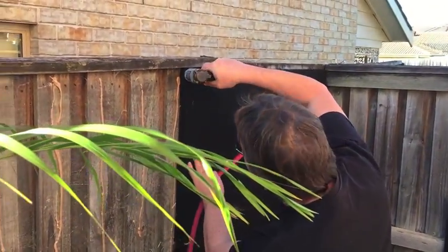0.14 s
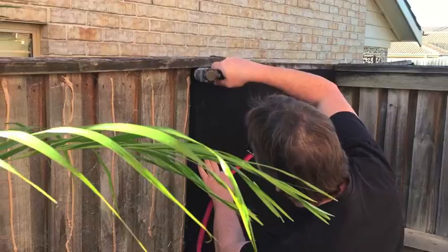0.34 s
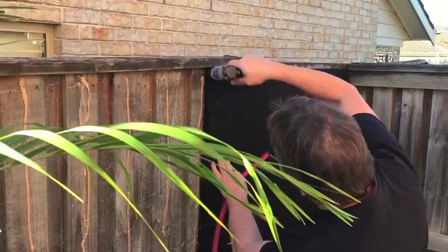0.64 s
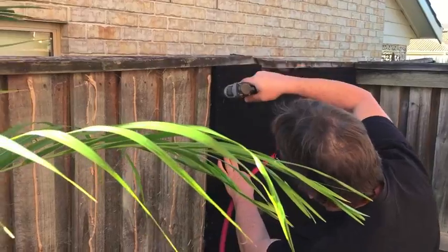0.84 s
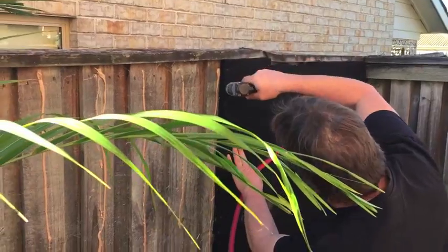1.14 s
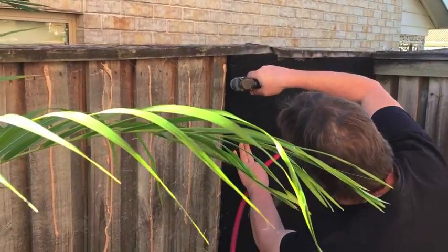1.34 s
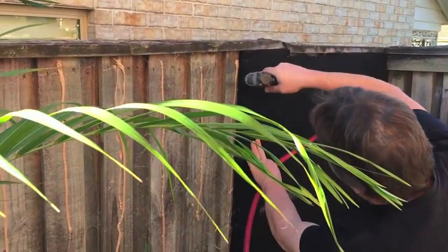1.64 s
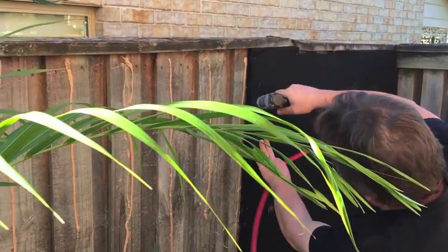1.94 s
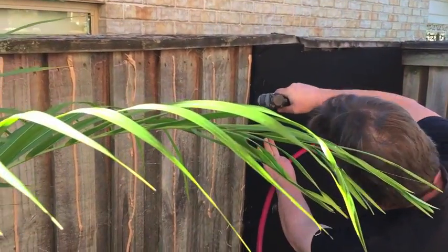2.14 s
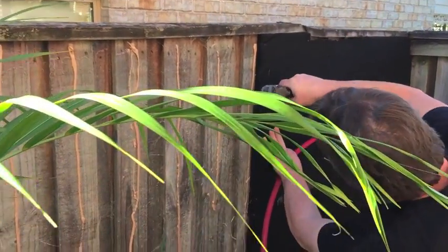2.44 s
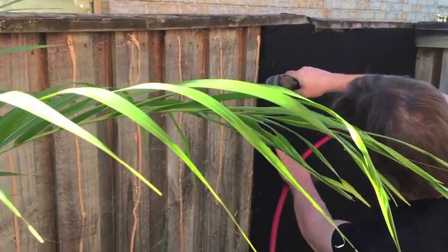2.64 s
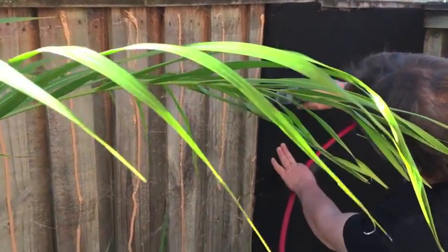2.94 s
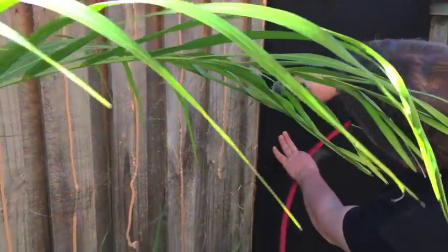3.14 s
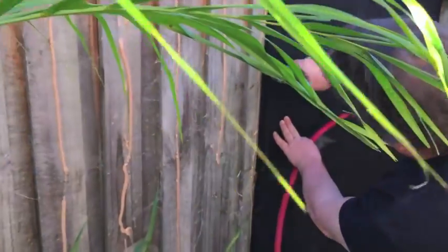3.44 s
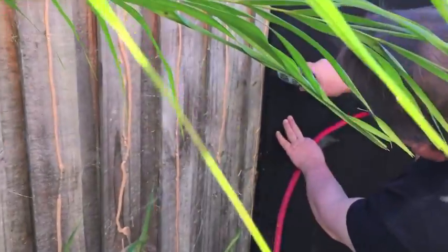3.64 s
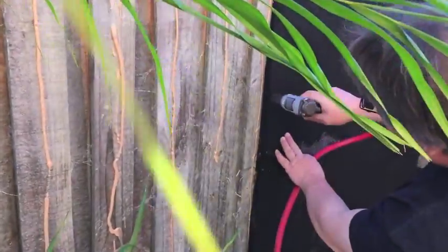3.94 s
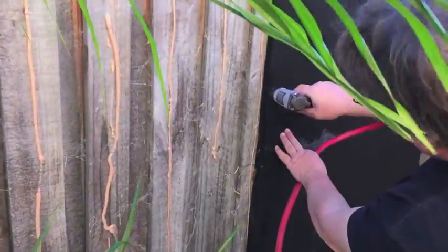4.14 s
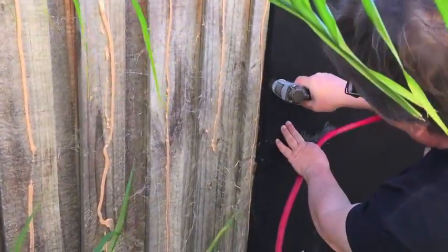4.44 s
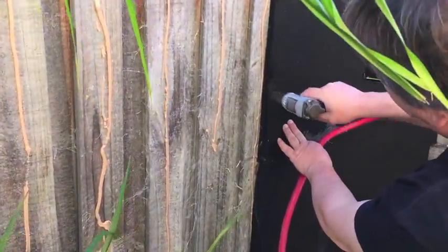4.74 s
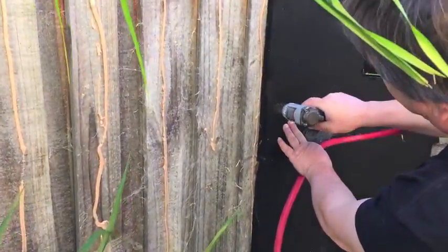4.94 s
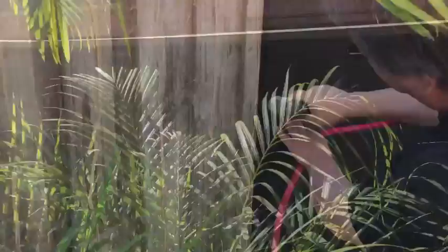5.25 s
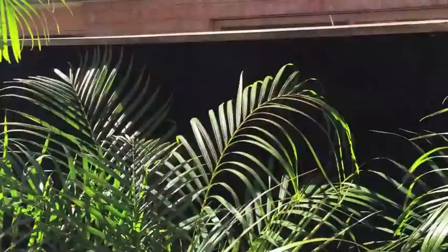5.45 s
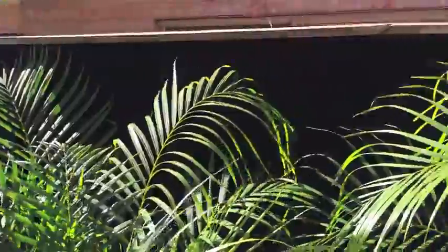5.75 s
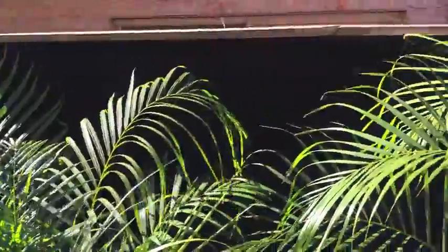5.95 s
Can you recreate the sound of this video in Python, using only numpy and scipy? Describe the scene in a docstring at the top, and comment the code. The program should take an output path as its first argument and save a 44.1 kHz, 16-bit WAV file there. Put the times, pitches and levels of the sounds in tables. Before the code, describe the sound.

Five evenly spaced pneumatic staple shots crack into fence boards, each with an exhaust puff, before an air compressor briefly chugs.

```python
"""A low outdoor rumble and faint scuffs, then an air-powered staple gun fires five staples through
lining into a wooden fence in a narrow yard. Each shot is a trigger tick, a spit of air and a blow
that rings the boards; on release the gun lets out its air and its piston knocks home. Wall and yard
echo the work, and leaves and lining rustle between shots. Near the end an air compressor chugs
briefly and fades, followed by three faint, far whistles."""
import sys
import numpy as np
from scipy import signal
from scipy.fft import rfft, irfft
from scipy.io import wavfile

SR = 44100
rng = np.random.default_rng(int(sys.argv[2]) if len(sys.argv) > 2 else 0)


def file_out(sig):
    """Save sig as 16-bit WAV at sys.argv[1]."""
    # one column per channel
    cols = np.atleast_2d(sig).T
    # limit, then scale
    lim = np.clip(cols, -1, 1)
    pcm = np.round(lim * 32767).astype(np.int16)
    wavfile.write(sys.argv[1], SR, pcm)


N = 268965
TIME = np.arange(N) / SR
AGE = np.arange(SR * 3 // 4) / SR  # seconds since a sound began


def gain_of(db):
    """Turns decibels into a number to multiply by."""
    return 10 ** (np.asarray(db) / 20)


def evened(x):
    """Scales a sound to an average (rms) level of 1."""
    return x / np.sqrt(np.mean(x ** 2) + 1e-20)


def add(mix, start_s, sound):
    """Mixes a sound in at start_s."""
    part = mix[max(round(start_s * SR), 0):][:len(sound)]
    part += sound[:len(part)]


def drift(points):
    """A wandering line through random points spread over the scene, mostly between -1 and 1."""
    return np.interp(TIME, np.linspace(0, TIME[-1], points), rng.standard_normal(points))


def colour(x, tone):
    """Makes some pitches louder and others softer, following rows of (pitch_hz, level_db)."""
    hz, db = np.transpose(tone)
    bins_hz = abs(np.fft.fftfreq(4096, 1 / SR))
    log_gain = np.log(gain_of(np.interp(np.log(bins_hz + 1), np.log(hz), db)))
    response = np.fft.ifft(np.exp(np.conj(signal.hilbert(log_gain)))).real  # never rings ahead of a hit
    return signal.oaconvolve(x, response[:len(bins_hz) // 2])[:len(x)]


def band_noise(hz):
    """White noise split into overlapping bands centred on hz."""
    spectrum = rfft(rng.standard_normal(len(AGE)))
    bins_hz = np.fft.rfftfreq(len(AGE), 1 / SR)
    weights = [np.interp(np.log(bins_hz + 1), np.log(hz), pick) for pick in np.eye(len(hz))]
    return np.array([irfft(spectrum * weight, len(AGE)) for weight in weights])


def burst(bands, rise_s, hold_s=0):
    """Noise that swells, holds, then dies away; each band drops 60 dB in its own fade_s."""
    hz, db, fade_s = np.transpose(bands)
    fall_db = 60 * np.maximum(AGE - hold_s, 0) / fade_s[:, None]
    return (band_noise(hz) * gain_of(db[:, None] - fall_db)).sum(0) * (1 - np.exp(-AGE / rise_s))


def ring(notes, rise_s, scatter_db, detune):
    """The fading notes of a struck object; each blow shares its energy among them a little differently."""
    hz, db, fade_s = np.transpose(notes)[:, :, None]
    share, shift, phase = rng.standard_normal((len(notes), 3)).T[:, :, None]
    waves = np.sin(2 * np.pi * (hz * (1 + detune * shift) * AGE + phase))
    loudness = gain_of(db + scatter_db * share - 60 * AGE / fade_s)
    return (waves * loudness).sum(0) * (1 - np.exp(-AGE / rise_s))


# the deep rumble outdoors: pitch_hz, level_db
RUMBLE_TONE = [(15, -33.5), (28, -13.5), (48, -2), (100, 2), (145, -2), (200, -12.5), (250, -13),
               (320, -22.5), (600, -42.5), (2000, -69.5)]
# the soft hiss above it: pitch_hz, level_db
HUSH_TONE = [(100, -2), (350, -1), (600, -4), (1000, -5), (1800, -9), (3000, -11), (6000, -17),
             (16000, -24)]
def outdoors():
    """A gently swelling low rumble that drops near the end, with a faint hush above it."""
    rumble_db, hush_db = -56.5, -70
    lull_db = -6.5 * np.clip((TIME - 5.3) / 0.24, 0, 1)
    swell = gain_of(1.6 * drift(points=70))
    rumble = gain_of(rumble_db + lull_db) * swell * evened(colour(rng.standard_normal(N), RUMBLE_TONE))
    hush = gain_of(hush_db + .6 * drift(points=40)) * evened(colour(rng.standard_normal(N), HUSH_TONE))
    return rumble + hush


def scuff(level_db, length_s, pitch_hz):
    """A rub of noise, strongest around pitch_hz; the briefest are dry ticks."""
    hz = np.geomspace(200, 16000, 14)
    octaves = np.log2(hz / pitch_hz)
    db_per_octave = np.where(octaves < 0, -5, -10.5)
    fade_s = np.full(len(hz), 0.016 + 2.7 * length_s)  # longer scuffs die away more slowly
    bands = np.c_[hz, level_db + abs(octaves) * db_per_octave, fade_s]
    return burst(bands, rise_s=length_s / 2, hold_s=length_s)


# scuffs on the lining, and one sharp dry click as the compressor's hum ends:
# start_s, level_db, length_s, pitch_hz
SCUFFS_AND_CLICK = [(0.168, -43.5, .012, 1490), (0.334, -45, 0.0054, 1587), (1.019, -50.5, 0.0055, 3500),
                    (1.312, -56, 0.0076, 900), (2.297, -46, 0.017, 1096), (2.92, -49.5, 0.026, 1900),
                    (3.386, -47, 0.0084, 1299), (3.952, -41, 0.00096, 4330), (4.276, -41.5, .0007, 4200),
                    (4.296, -43, 0.023, 1000), (4.355, -55, 0.015, 3000), (4.994, -48.5, 0.0018, 4200),
                    (5.073, -29.5, 0.013, 1700), (5.11, -51.5, .03, 3000), (5.207, -51.5, 0.0098, 3600),
                    (5.228, -38, 0.0023, 1300), (5.577, -42.5, 0.0027, 6660)]
# soft low bumps: start_s, pitch_hz, level_db, fade_s
SOFT_BUMPS = [(5.262, 153, -27.5, 0.07), (5.93, 63, -34.5, 0.051)]
def small_noises():
    """Scuffs on the lining, fainter ones at random, and near the end a dry click and two soft bumps."""
    fidgets_per_s, work_s = 2, 6.6
    out = np.zeros(N)
    for start_s, level_db, length_s, pitch_hz in SCUFFS_AND_CLICK:
        add(out, start_s, scuff(level_db, length_s, pitch_hz))
    for when, octave in rng.random((round(fidgets_per_s * work_s), 2)):
        add(out, when * work_s, scuff(level_db=-58, length_s=0.0044, pitch_hz=2800 * 2 ** (octave - .5)))
    for start_s, pitch_hz, level_db, fade_s in SOFT_BUMPS:
        loudness = gain_of(level_db - 60 * AGE / fade_s) * (1 - np.exp(-AGE / 0.00095))
        add(out, start_s, loudness * np.sin(2 * np.pi * pitch_hz * AGE))
    return out


# the trigger's click: pitch_hz, level_db, fade_s
TRIGGER_NOISE = [(500, -53, .03), (3000, -45.5, .03), (7000, -41, 0.023), (16000, -47, .02)]
def trigger_tick():
    """The pulled trigger makes a tiny, bright tick."""
    return burst(TRIGGER_NOISE, rise_s=0.00087)


# air escaping at the valve: pitch_hz, level_db, fade_s
VALVE_NOISE = [(200, -28, 0.05), (1500, -21.5, 0.016), (2770, -18.5, 0.054), (4480, -24.5, 0.15),
               (7000, -18.5, 0.068), (10100, -21.5, 0.087), (16000, -18.5, 0.041)]
def air_spit(level_db, rise_s, hold_s):
    """Squeezed air hisses through the firing valve."""
    return gain_of(level_db) * burst(VALVE_NOISE, rise_s, hold_s)


# boards and rail ringing with the gun pressed on them: pitch_hz, level_db, fade_s
FENCE_NOTES = [(85, -35.5, 0.5), (156, -30, 0.18), (196, -20.5, 0.13), (235.3, -22, 0.3), (304, -9, 0.1),
               (338, -30.5, 0.73), (372.3, -23.5, 0.32), (441, -24.5, 0.24), (619, -16, 0.23),
               (650, -19.5, 0.21), (850.2, -28.5, 0.18), (945, -20, 0.28), (1071.6, -15.5, 0.13),
               (1150, -16, 0.066), (1327, -20, 0.27), (1350, -13, .14), (1446, -22, 0.13),
               (1527, -21, 0.31), (1948, -22, 0.3), (2010, -24, 0.14), (2650, -18, 0.15),
               (3300, -28.5, 0.14), (3536, -18.5, 0.12), (3960, -27.5, 0.24)]
# the noisy crunch of struck wood: pitch_hz, level_db, fade_s
WOOD_NOISE = [(55, -35, 0.16), (151, -13.5, 0.041), (343.2, -1.5, .14), (730, 3, 0.044), (1300, 4.5, .14),
              (2134, -4, 0.09), (3960, -3.5, 0.074), (4800, -14, 0.034), (9000, -12.5, 0.042),
              (10500, -19.5, 0.079), (16000, -19, 0.089)]
def fence_blow(boost_hz, boost_db, dip_hz, dip_db):
    """The blow rings the boards; each spot on the fence favours one range of pitches and dulls another."""
    boards = gain_of(-5.5) * ring(FENCE_NOTES, rise_s=0.00052, scatter_db=2.0, detune=0.0062)
    splinters = gain_of(0.5) * burst(WOOD_NOISE, rise_s=.0012, hold_s=0.0024)
    hz = np.geomspace(20, 16000, 120)
    width_octaves = 0.27
    boost, dip = (np.exp(-.5 * (np.log2(hz / mid) / width_octaves) ** 2) for mid in (boost_hz, dip_hz))
    bass_db = 15 * np.minimum(np.log2(hz / 85), 0)  # the blow's deepest bass, below 85 Hz, is softened
    return colour(boards + splinters, np.c_[hz, boost_db * boost + dip_db * dip + bass_db])


# the steel driver blade and staple holder ringing: pitch_hz, level_db, fade_s
STEEL_NOTES = [(4300, -25.5, 0.016), (5380, -20, 0.027), (7040, -19, 0.048), (8300, -20, 0.014),
               (9260, -22.5, 0.04), (12880, -24.5, 0.075)]
# the driver hitting its stop: pitch_hz, level_db, fade_s
CRACK_NOISE = [(298, -23.5, 0.026), (1500, -0.5, 0.036), (4000, -2.5, 0.024), (6900, -3.5, 0.023),
               (10600, -12, 0.023), (13000, -10.5, 0.049), (16000, -17.5, 0.025)]
def driver_crack():
    """The blade that drives the staple cracks against its stop, hardest in the first instant."""
    steel = ring(STEEL_NOTES, rise_s=.0003, scatter_db=2, detune=.004)
    crack = burst(CRACK_NOISE, rise_s=.0003, hold_s=.001)
    snap = 1 + 1.2 * np.exp(-AGE / .0025)
    return snap * (steel + crack)


# one row a staple: start_s, valve_lead_s, blow_db, boost_hz, boost_db, dip_hz, dip_db
STAPLES = [(0.498, 0.016, -1, 3600, 5, 270, -9), (1.5115, 0.014, -2.5, 600, 4.5, 1100, -4),
           (2.5304, 0.015, 1.5, 720, 1.5, 1420, -8), (3.5266, .0143, 0.5, 520, 3.5, 3300, -3),
           (4.577, 0.014, -0.5, 195, 9.5, 650, -4.5)]
def shots():
    """The trigger ticks, the valve spits, the driver hits the boards and then its own stop."""
    out = np.zeros(N)
    for start_s, valve_lead_s, blow_db, *spot in STAPLES:
        valve_s = start_s - valve_lead_s
        add(out, valve_s - .009, trigger_tick())
        add(out, valve_s - .004, air_spit(level_db=-11, rise_s=0.0017, hold_s=0.0024))  # air seeps first
        add(out, valve_s - .0005, air_spit(level_db=1.6, rise_s=0.002, hold_s=0.0013))  # the valve lifts
        add(out, start_s, gain_of(blow_db) * fence_blow(*spot))
        add(out, start_s + .0025, driver_crack())
    return out


# first bounces off fence, arm and ground: delay_s, gain
NEAR_BOUNCES = [(.0009, .15), (.0023, .16), (.0049, .18), (.0105, .12)]
def near_reflections(x):
    """The direct sound plus its first few quick echoes."""
    out = x.copy()
    for delay_s, gain in NEAR_BOUNCES:
        add(out, delay_s, gain * x)
    return out


def echoes(x, bands, build_s):
    """Many echoes blur into a tail that builds up over build_s and then dies away."""
    hz, db, fade_s = np.transpose(bands)[:, :, None]
    shape = gain_of(-60 * AGE / fade_s) * (1 - np.exp(-(AGE / build_s) ** 2))
    shape /= np.linalg.norm(shape, axis=1, keepdims=True)  # so db compares the tail with the direct sound
    tail = (band_noise(hz[:, 0]) * gain_of(db) * shape).sum(0)
    return signal.fftconvolve(x, tail)[:N]


# sound bouncing between fence and house wall: pitch_hz, level_db, fade_s
WALL_ECHO = [(79, -1.5, 0.3), (246, -13, 0.24), (1000, -11.5, 0.22), (4000, -10, 0.15), (7900, -17, 0.17),
             (16000, -18, 0.15)]
# sound coming back from the wider yard: pitch_hz, level_db, fade_s
YARD_ECHO = [(80, -19, .8), (400, -30.5, 0.93), (1800, -29.5, 1), (3800, -26.5, 0.54), (7700, -35, 0.24),
             (16000, -45.5, .22)]
def yard_echoes(work):
    """Wall and yard answer differently at each place that the gun moves to."""
    move_after_s = .6
    moves = [0] + [round((start_s + move_after_s) * SR) for start_s, *_ in STAPLES[:-1]] + [N]
    out = np.zeros(N)
    for start, end in zip(moves, moves[1:]):
        wall = echoes(work[start:end], WALL_ECHO, build_s=0.0056)
        yard = echoes(work[start:end], YARD_ECHO, build_s=0.019)
        add(out, start / SR, wall + yard)
    return out


# the thin hiss before the exhaust opens: pitch_hz, level_db, fade_s
LEAK_NOISE = [(504.5, -64, .02), (4000, -48.5, .02), (7000, -35, .02), (11000, -41.5, .02),
              (16000, -45.5, .02)]
def air_leak():
    """A little air slips out as the trigger is let go."""
    return burst(LEAK_NOISE, rise_s=.003, hold_s=0.0074)


# air rushing out of the gun: pitch_hz, level_db, fade_s
EXHAUST_NOISE = [(45.8, -42.5, .1), (80.5, -9, 0.13), (140.5, -8.5, 0.075), (414, -12.5, 0.14),
                 (1000, -17.5, 0.038), (1970, -27.5, 0.078), (2740, -15.5, 0.16), (4500, -17.5, 0.1),
                 (9000, -17, 0.11), (11500, -15.5, 0.032), (11400, -10.5, 0.09), (16000, -19.5, .08)]
def exhaust_puff():
    """The exhaust valve pops open, then widens, and the used air rushes out."""
    opening = 1 - 0.25 * np.exp(-AGE / 0.014)
    return gain_of(-0.93) * opening * burst(EXHAUST_NOISE, rise_s=0.00095, hold_s=.022)


# the gun's body ringing: pitch_hz, level_db, fade_s
GUN_NOTES = [(225, -37, .2), (316.3, -28, 0.17), (359.8, -30, 0.062), (681, -33, 0.22), (984.7, -24, 0.084),
             (1300, -25, 0.076), (1430, -38, 0.075), (1700, -24, 0.063), (1820, -29.5, 0.096),
             (2450, -38, .07), (2647, -20, 0.034), (3710, -25.5, 0.052)]
# the piston hitting its stop: pitch_hz, level_db, fade_s
KNOCK_NOISE = [(108, -45, .08), (335, 0.5, 0.028), (566, -32.5, 0.041), (1525, -1.5, 0.039),
               (3000, -18, 0.02), (4935, -11.5, 0.017), (11810, -28, .03)]
def piston_knock(body_hz):
    """The piston knocks back home and rings the gun's body, with a boost around body_hz."""
    body = gain_of(1.5) * ring(GUN_NOTES, rise_s=0.00017, scatter_db=3.0, detune=.01)
    knock = burst(KNOCK_NOISE, rise_s=0.0019, hold_s=0.0006)
    return colour(body + knock, [(body_hz / 1.4, 0), (body_hz, 4), (body_hz * 1.4, 0)])


# air flowing in from the hose: pitch_hz, level_db, fade_s
REFILL_NOISE = [(148.6, -43, .08), (240.7, -17.5, .05), (400, -28.5, 0.055), (1500, -31.5, 0.061),
                (4000, -31.5, 0.08), (6960, -31.5, 0.16), (10500, -33.5, 0.082), (13000, -28.5, 0.029),
                (16000, -37, .06)]
def air_refill():
    """Air hums and hisses back into the gun's chamber, easing off as it fills."""
    return burst(REFILL_NOISE, rise_s=.01, hold_s=.065) * np.exp(-AGE / .06)


# one row each time the trigger is let go: start_s, knock_db, piston_travel_s, body_hz
TRIGGER_RELEASES = [(0.6771, -0.5, 0.027, 2740), (1.687, 0.5, .027, 1760), (2.686, -3, .024, 1850),
                    (3.6723, -1, .0245, 1087), (4.739, -0.5, .024, 1006)]
def releases():
    """Air rushes out until the piston knocks home; then the chamber refills."""
    out = np.zeros(N)
    for start_s, knock_db, piston_travel_s, body_hz in TRIGGER_RELEASES:
        add(out, start_s - .015, air_leak())
        add(out, start_s, exhaust_puff())
        add(out, start_s + piston_travel_s, gain_of(knock_db) * piston_knock(body_hz))
        add(out, start_s + piston_travel_s, air_refill())
    return out


def resonate(x, pitch_hz, width_hz):
    """Keeps the part of a sound that lies near a moving pitch."""
    spin = np.exp(2j * np.pi * np.cumsum(pitch_hz) / SR)
    feedback = np.exp(-np.pi * width_hz / SR)
    return (spin * signal.lfilter([1 - feedback], [1, -feedback], x / spin)).real


# palm leaves brushing past: peak_s, level_db, length_s, pitch_hz
LEAF_SWISHES = [(2.89, -64.5, 0.21, 4970), (3.109, -68, 0.16, 4000), (3.22, -69, .4, 7990),
                (3.921, -69, 0.36, 6240), (4.19, -60.5, 0.23, 9700), (4.34, -73, .25, 9120)]
# the tone of their rustle: pitch_hz, level_db
LEAF_TONE = [(300, -33), (1500, -8.5), (3500, -2.5), (7000, -3), (10000, -4), (13000, -4), (16000, -7)]
def leaves():
    """Leaves slide over each other: each swish swells and fades, with its own pitch and a fine crackle."""
    rise_share, edge_db = 0.39, -9.5  # part of the length spent swelling; drop at either end
    peak_s, level_db, length_s, pitch_hz = np.transpose(LEAF_SWISHES)
    along = (TIME - peak_s[:, None]) / length_s[:, None]
    from_peak = np.maximum(-along / rise_share, along / (1 - rise_share))
    loudness = gain_of(level_db[:, None] + edge_db * from_peak).max(0)
    swish = evened(resonate(rng.standard_normal(N), np.interp(TIME, peak_s, pitch_hz), width_hz=4500))
    crackle = evened(rng.standard_normal(N) * gain_of(5 * drift(points=2500)))
    catching = gain_of(2.5 * drift(points=350))
    return loudness * evened(catching * colour(swish + crackle, LEAF_TONE))


# the tone of the compressor's chugging: pitch_hz, level_db
PUMP_TONE = [(48, -3), (96, 3.5), (143, -4), (191, 0.5), (270, -12.5), (335, -2), (400, -12.5), (1050, -21),
             (1500, -17.5), (1750, -18), (1950, -15), (2450, -28), (3300, -32.5), (9000, -55)]
def compressor():
    """Every pump stroke repeats the same thud, with a clatter that changes from stroke to stroke."""
    strokes_per_s, level_db = 49.7, -42
    peak_s, swell_s, stop_s = 5.3, 0.085, 0.28
    harmonics = np.arange(1, 50)[:, None]
    turn = np.linspace(0, 1, 2048)
    one_thud = np.cos(2 * np.pi * (harmonics * turn + rng.random(harmonics.shape))).sum(0)
    along_stroke = strokes_per_s * TIME % 1
    thuds = evened(np.interp(along_stroke, turn, one_thud))
    pulsing = 0.48 + np.exp(-along_stroke / 0.39)
    clatter = rng.standard_normal(N) * pulsing * gain_of(1.3 * drift(points=600))
    clatter = evened(colour(clatter, [(200, -9.5), (700, 1), (2000, 3.5)]))
    swell = np.exp(-(np.minimum(TIME - peak_s, 0) / swell_s) ** 2)
    fade = np.clip(1 - (TIME - peak_s) / stop_s, 0, 1) ** 0.65
    return gain_of(level_db) * swell * fade * evened(colour(thuds + 2.9 * clatter, PUMP_TONE))


# faint far whistles: start_s, length_s, pitch_hz, level_db
FAR_WHISTLES = [(5.682, 0.057, 1250, -63.5), (5.761, .15, 1216, -69.5), (5.855, 0.064, 1415, -61)]
def whistles():
    """Far wavering notes, perhaps a bird, blurred by echoes off the walls."""
    out = np.zeros(N)
    for start_s, length_s, pitch_hz, level_db in FAR_WHISTLES:
        waver = 1 + 0.0096 * drift(points=500)[:len(AGE)]
        cycles = np.cumsum(pitch_hz * waver) / SR
        swell = np.sin(np.pi * np.minimum(AGE / length_s, 1))
        add(out, start_s, gain_of(level_db) * swell * np.sin(2 * np.pi * cycles))
    return out + echoes(out, WALL_ECHO, build_s=0.022)


def scene():
    """The work at the fence, thrown back by wall and yard, over the outdoor background, in mono."""
    work = near_reflections(shots() + releases() + small_noises())
    return (work + yard_echoes(work) + leaves() + compressor() + whistles() + outdoors())[None]


def record(dry):
    """Overload rounds off the loudest peaks; then the deepest bass and highest treble are cut."""
    ceiling, lowest_hz, highest_hz = .88, 46, 16050
    rounded = dry / (1 + (dry / ceiling) ** 4) ** (1 / 4)
    bass_cut = signal.butter(3, lowest_hz, "highpass", fs=SR, output="sos")
    treble_cut = signal.firwin(401, highest_hz, window=("kaiser", 8), fs=SR)
    return signal.oaconvolve(signal.sosfilt(bass_cut, rounded), treble_cut[None], "same")


dry = scene()
out = record(dry)
file_out(out)
```